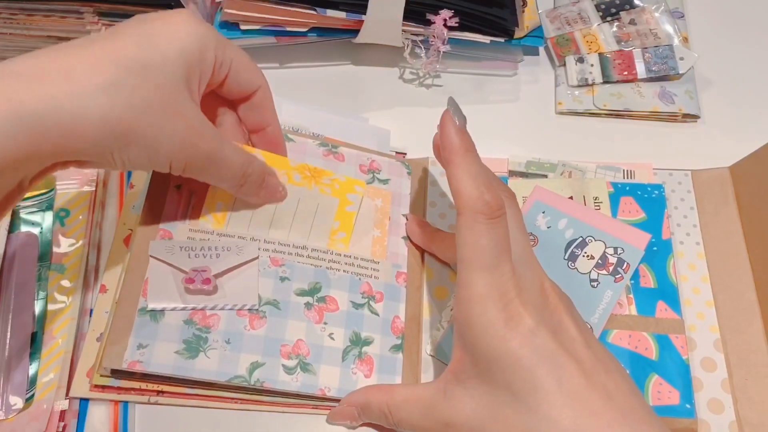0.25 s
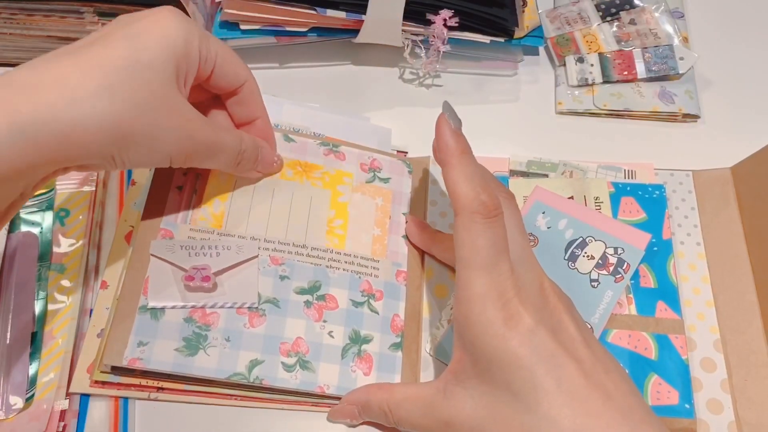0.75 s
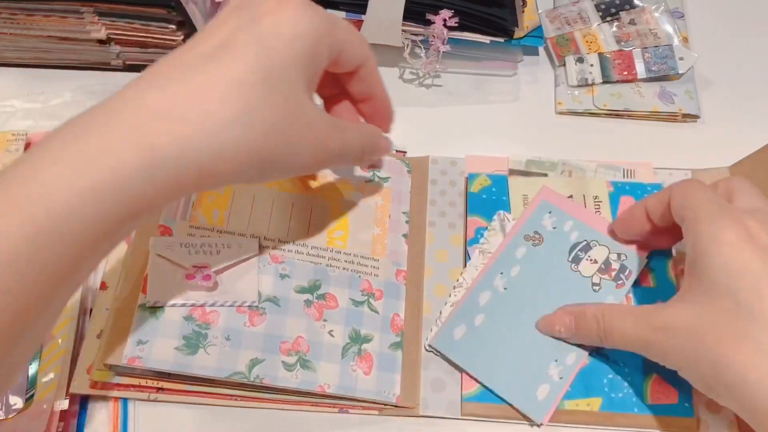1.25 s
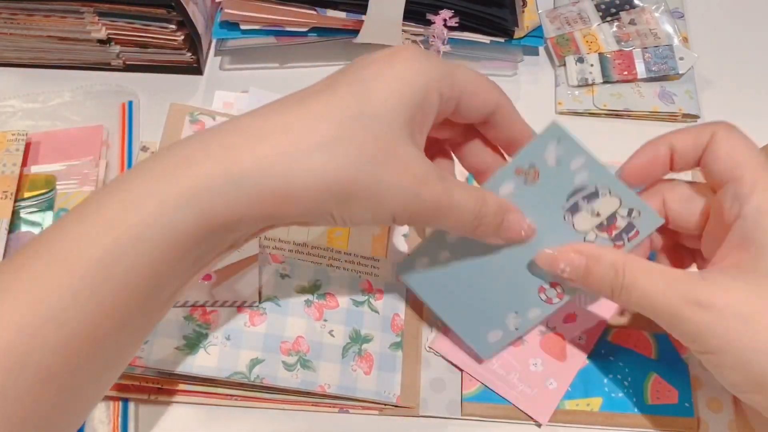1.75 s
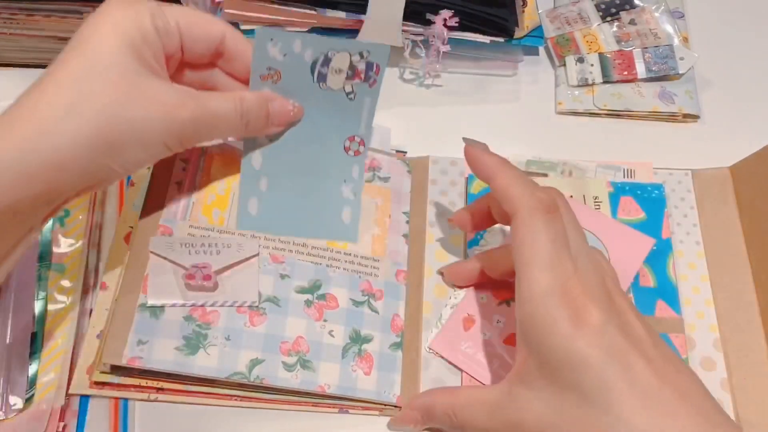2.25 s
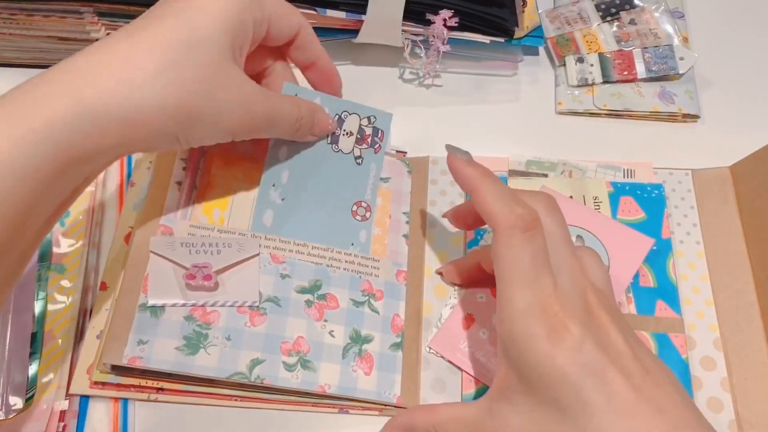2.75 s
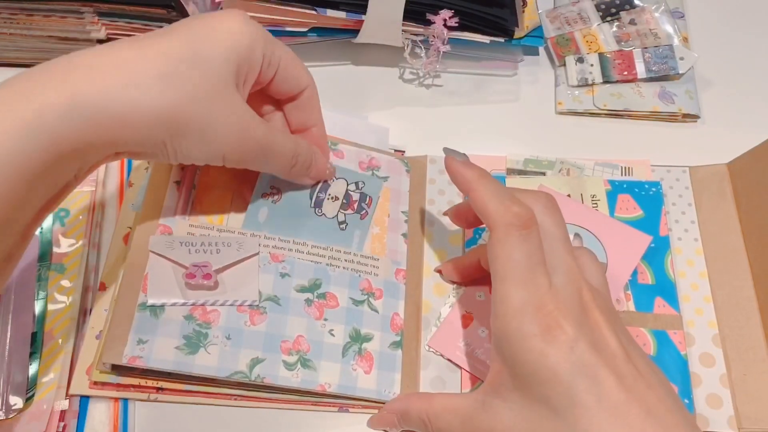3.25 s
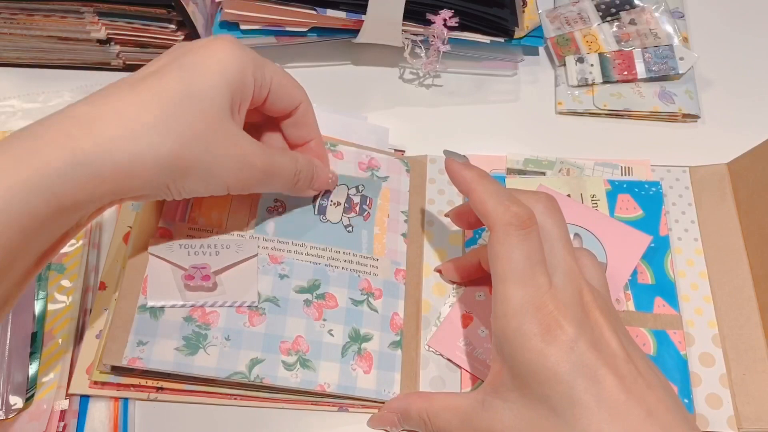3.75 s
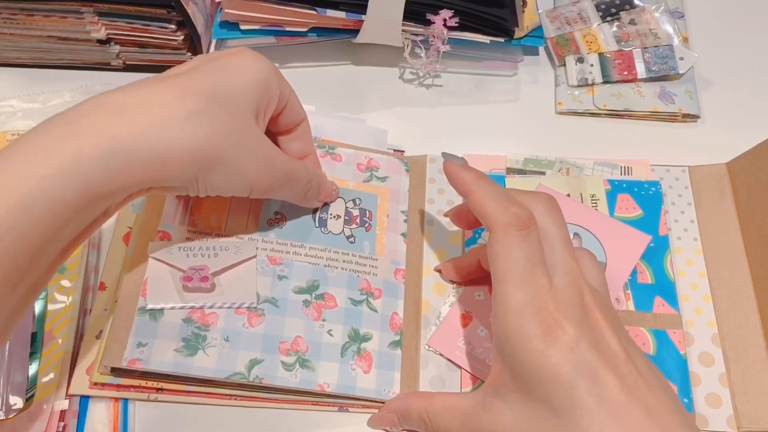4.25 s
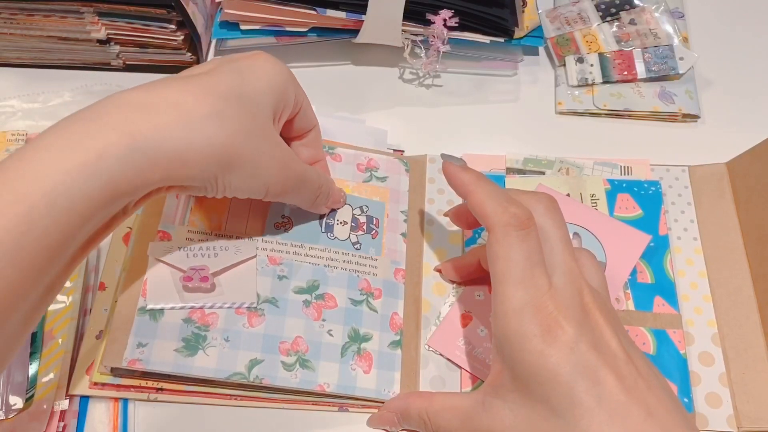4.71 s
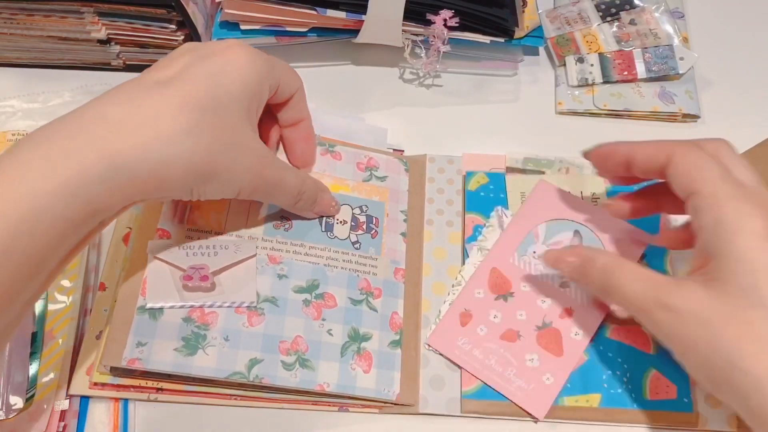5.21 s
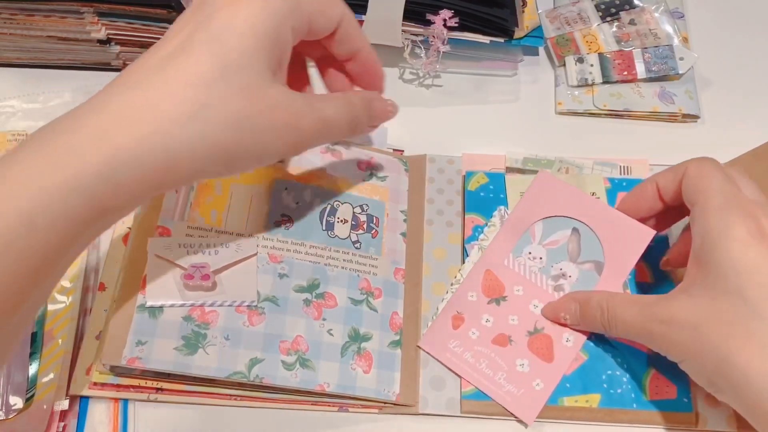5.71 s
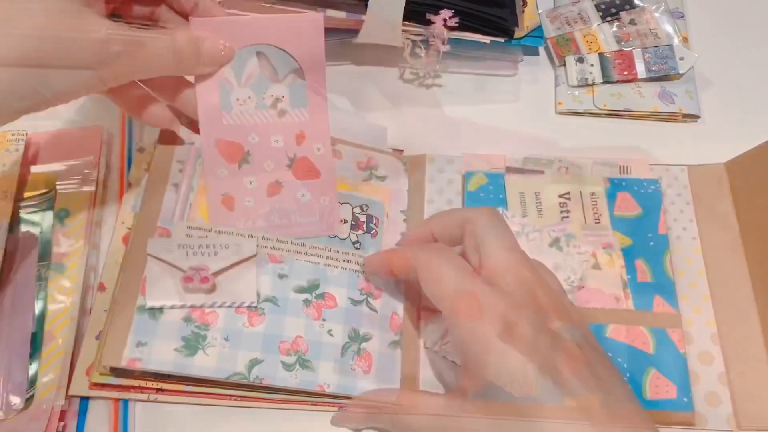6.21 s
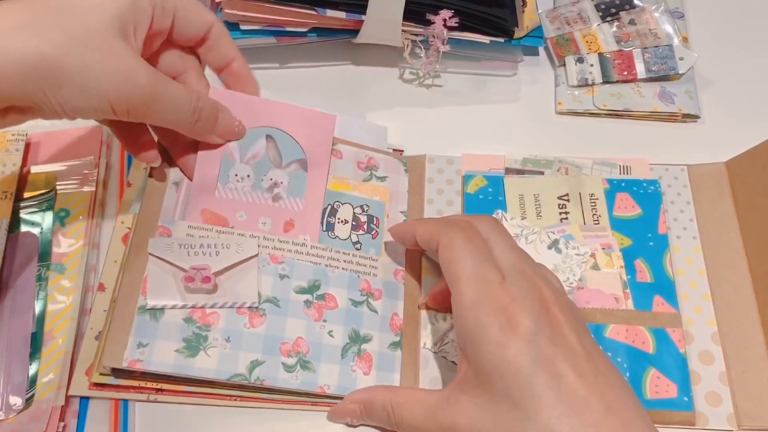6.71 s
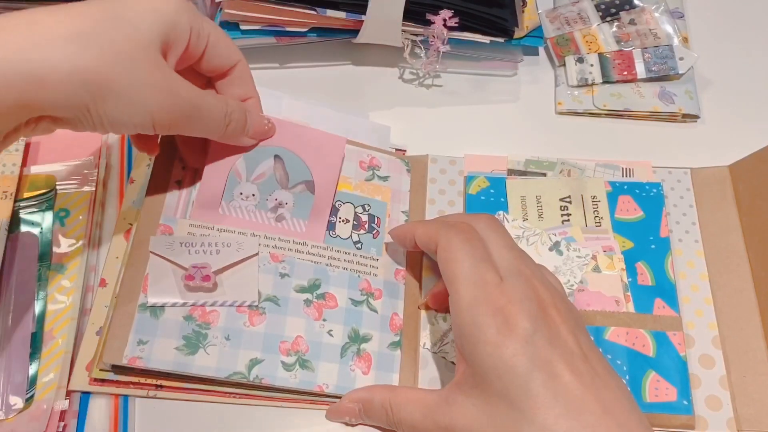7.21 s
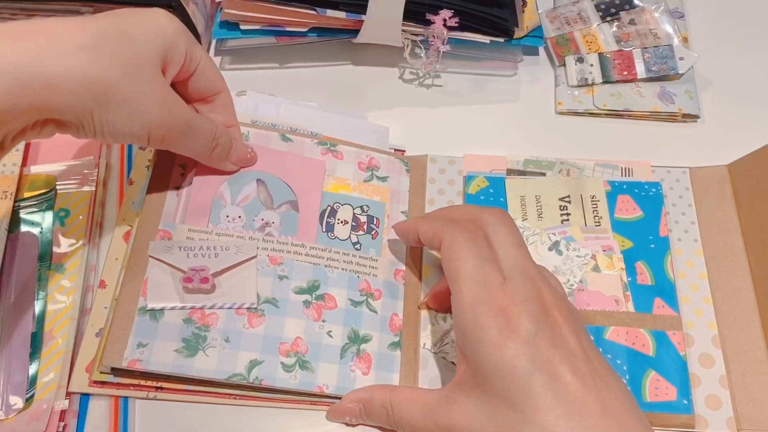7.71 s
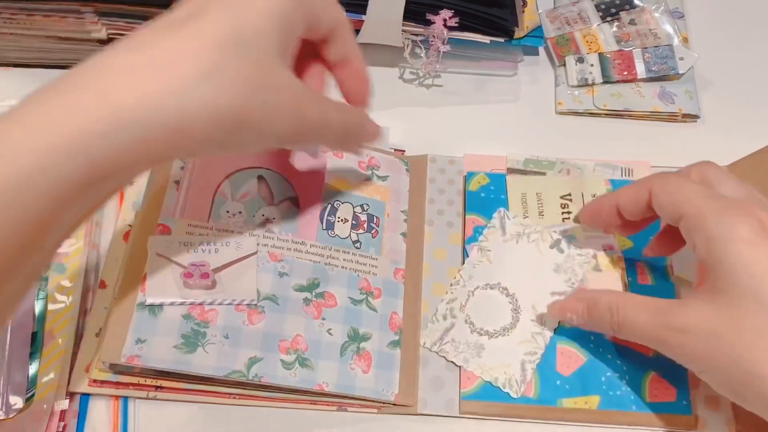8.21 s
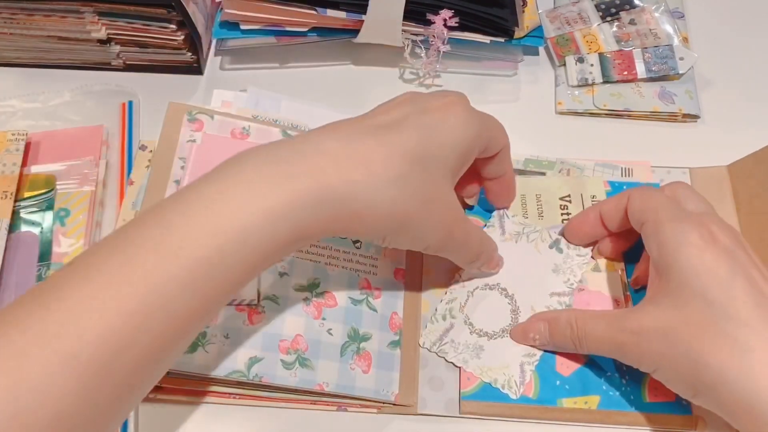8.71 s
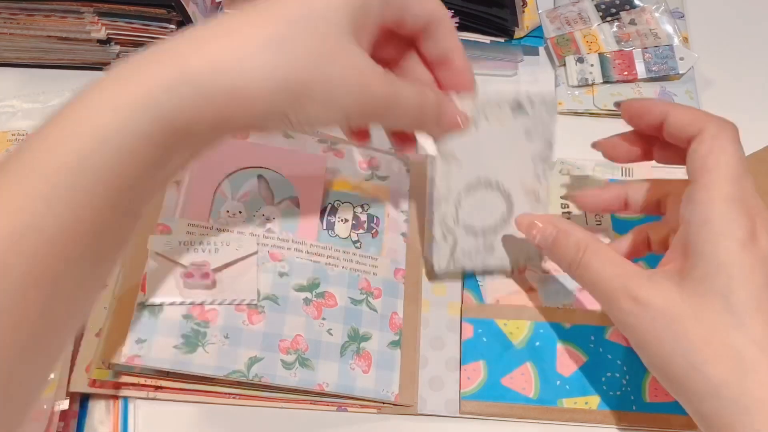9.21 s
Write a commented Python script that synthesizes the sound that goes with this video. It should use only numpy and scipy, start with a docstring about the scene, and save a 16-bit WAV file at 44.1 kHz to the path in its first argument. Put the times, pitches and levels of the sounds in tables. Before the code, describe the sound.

Close, quiet paper handling: a burst of sharp card snaps and a flap early, then gentle rustling strokes over a deep steady drone.

```python
"""On a desk in a small room, hands slide small cards out of and into a handmade journal's paper pockets.
Strokes of paper on paper are coloured friction noise that swells with the speed of the hand.
Edges and nails tick as short bursts, scraped cards ring with gliding resonances, one card flaps free.
A deep wavering sine hums over soft low noise; a stereo microphone pair sets the width."""
import sys
import numpy as np
from scipy import signal
from scipy.fft import rfft, irfft, next_fast_len
from scipy.io import wavfile

SR = 44100
rng = np.random.default_rng(int(sys.argv[2]) if len(sys.argv) > 2 else 0)


def master(y):
    """Save y as 16-bit WAV."""
    cut = np.clip(np.atleast_2d(y).T, -1, 1)
    pcm = np.round(cut * 32767)  # scale
    wavfile.write(sys.argv[1], SR, pcm.astype(np.int16))


N = 417186
TIME = np.arange(N) / SR
SIZE = next_fast_len(N + SR // 2)  # FFT length with room for tails
BINS = np.maximum(np.arange(SIZE // 2 + 1) * SR / SIZE, 1)  # Hz


def slides(rasp_db=-3.5, hiss_db=1.87, body_db=-6.5, judder_db=2.04, crackle_db=-7.5):
    """Paper rubs on paper: each stroke mixes rasp, its own share of hiss, and a slower-growing sheet body."""
    # Pushes and pulls of paper over paper. Each row: start in seconds, length in seconds,
    # share of the length at which the hand is fastest (0-1), relative level in dB, extra hiss in dB.
    strokes = [(-0.02, .14, 0.42, -50.5, 4), (0.108, 0.24, 0.24, -63.5, 0.5), (0.256, .11, 0, -57.5, -1),
               (0.374, 0.048, 0.4, -65, 1), (0.412, .12, 0.52, -53, 1), (0.576, .33, 0.15, -57.5, 1.5),
               (0.697, 0.068, 0.6, -56, 6), (0.896, 0.086, .6, -64.5, 8.5), (1.176, 0.14, 0, -68, 1),
               (1.384, 0.17, 0.1, -80.5, 2.5), (1.47, 0.19, 0.86, -58.5, 4), (1.768, 0.28, 0.7, -75.5, 3.5),
               (2.04, 0.27, 0.34, -61, 6), (2.158, 0.29, 0.47, -47, -1), (2.455, 0.26, 0.06, -66.5, 1),
               (2.7, 0.097, 0.46, -54.5, -2.5), (2.771, 0.3, 0.78, -51, 4), (3.081, 0.61, 0.05, -62.5, 2),
               (3.151, .17, 0.46, -49.5, -1), (3.4, 0.11, 0.59, -49.5, -2.5), (3.55, 0.25, 0.2, -51, -3),
               (3.876, 0.057, 0.24, -64.5, -0.5), (3.969, 0.1, 0.47, -73.5, 7.5),
               (4.064, 0.086, 0.5, -72.5, 9), (4.235, 0.061, 0.13, -73, 6.5), (4.297, 0.086, 0.5, -71, 5),
               (4.37, 0.096, 0.2, -61, -2), (4.489, 0.089, 0.5, -59.5, -2.5), (4.86, 0.2, 0.06, -63.5, 9),
               (5.035, .21, 0, -80.5, 3.5), (5.252, .1, 0.55, -73, -7), (5.345, 0.13, 0.22, -59, -3),
               (5.467, 0.14, 0.25, -68.5, -4), (5.625, 0.17, 0, -76, -2), (5.759, 0.2, 0.22, -65, 2.5),
               (5.952, 0.19, 0.79, -61.5, 1.5), (6.127, 0.14, 0.9, -61, -4),
               (6.277, 0.17, 0.6, -58.5, -3.5), (6.374, 0.29, 0.15, -53, 3.5), (6.686, 0.22, 0.44, -67, 5),
               (6.886, 0.18, 0.56, -55, -3.5), (7.076, 0.2, 0.33, -56, -2), (7.289, 0.085, 0.5, -57, -3),
               (7.332, 0.24, 0.33, -67.5, 0), (7.764, 0.25, 0.25, -63, 1), (8.672, 0.55, 0.41, -63, -6),
               (8.872, 0.245, 0.94, -53, -1), (9.301, 0.17, 0.63, -76, 7)]
    # Colours of the rasp, the hiss and the sheet body. Each row: frequency in Hz, relative dB per Hz.
    rasp_colour = [(1300, -17), (1900, -4), (2700, 5.5), (3400, 1), (4000, -0.5), (5000, -1.5), (5900, -17),
                   (7200, -9.5)]
    hiss_colour = [(3600, -34.5), (5200, -3.5), (6300, -1.5), (10500, 1), (12000, -0.5), (15500, -4)]
    body_colour = [(150, -31.5), (330, 2), (560, 6.5), (800, 2.5), (1050, -0.5), (1350, -5), (1700, 1),
                   (2300, -6)]
    rasp_growth, hiss_growth, body_growth = 0.99, 1, 0.65  # exponents on hand speed
    # a reference stroke level; the share of the dB above or below it that the body follows
    firm_db, body_follows = -56.5, 0.7
    lift_s = 0.041  # the sheets part gradually around the end of a stroke

    power = np.zeros((3, N))
    for start, length, fastest, level, bright in strokes:
        whole = length + lift_s / 2
        during = span(start, start + whole)
        speed = hand_speed(start, whole, fastest * length / whole)
        contact = np.clip((start + whole - TIME[during]) / lift_s, 0, 1)
        rasp = from_db(level + rasp_db) * speed ** rasp_growth
        hiss = from_db(level + bright + hiss_db) * speed ** hiss_growth
        body_level = firm_db + body_follows * (level - firm_db) + body_db
        body = from_db(body_level) * speed ** body_growth
        power[:, during] += (contact * np.array([rasp, hiss, body])) ** 2

    smooth = rng.standard_normal((2, N))
    # small creases give way
    crackle = friction(catches_per_s=110, size_db=-1.0, slip_s=0.00047, smooth_share=0)
    rub = off_hand(smooth + from_db(crackle_db) * crackle)
    rub = rub * from_db(judder_db * drift(17))  # the hand never moves quite evenly
    colours = (rasp_colour, hiss_colour, body_colour)
    return sum(gain * coloured(rub, colour) for gain, colour in zip(np.sqrt(power), colours))


def off_hand(x, echo_db=-10.5, lag_s=0.000893, travel=0.25):
    """The moving hand reflects the sound, so a comb of soft peaks wanders through it."""
    late = np.arange(N) - SR * lag_s * np.exp(travel * drift(0.84))
    echo = np.array([np.interp(late, np.arange(N), row) for row in x])
    return rms_one(x + from_db(echo_db) * echo)


def scrapes(fastest=0.48):
    """Fibres catch in a resonance that glides as the rubbing point travels along the card."""
    # An edge runs along a card, whose free length rings.
    # Each row: start in seconds, length in seconds, first pitch in Hz, last pitch in Hz, relative level in dB.
    card_runs = [(1.578, 0.053, 4550, 1970, -51), (1.65, 0.093, 890, 1760, -57),
                 (1.736, 0.041, 1990, 2940, -50), (4.87, 0.2, 5400, 5600, -75),
                 (5.353, 0.1, 3200, 1900, -68), (6.364, 0.25, 5600, 4770, -56),
                 (8.727, .031, 850, 1150, -52), (8.899, 0.026, 1110, 1310, -49),
                 (8.78, 0.2, 2530, 3300, -61.5), (9.037, 0.09, 5820, 5100, -51.5)]
    width = 0.09  # half width of the resonance as a share of its middle pitch
    out = np.zeros((2, N))
    grain = friction(catches_per_s=140, size_db=4.5, slip_s=0.0011, smooth_share=0.75)
    for start, length, first_hz, last_hz, db in card_runs:
        during = span(start, start + length)
        speed = hand_speed(start, length, fastest)
        glide_hz = np.geomspace(first_hz, last_hz, len(speed))
        turn = np.exp(2j * np.pi * np.cumsum(glide_hz) / SR)
        # shift the gliding pitch down to zero, keep a narrow band, shift it back up
        ring = passed(grain[:, during] / turn, width * np.sqrt(first_hz * last_hz), "low") * turn
        out[:, during] += from_db(db) * speed * rms_one(ring.real)
    return out


def ticks(level_db=-5.0, thud_stretch=1.8, thud_db=14.0, crack_db=3.5, crisp_db=2.0,
          crisp_db_per_octave=1.0, skid_db=-7.5, ring_width=0.28, apart_db=-11.0):
    """Edges and nails snap: broad crack, short card ring, page thud, faint skid; higher rings are crisper."""
    # Each row: time in seconds, relative level in dB, ring frequency in Hz, relative thud level in dB.
    snaps = [(.103, -37, 790, -10), (.26, -40.5, 2840, -18), (.587, -48.5, 2300, -7),
             (1.17, -43.5, 3060, -38), (1.204, -41, 1060, -16), (1.5, -20.5, 4170, -17),
             (1.564, -30.5, 4700, -17), (1.675, -31.5, 802, -12), (1.699, -27, 1210, -14),
             (1.711, -25, 985, -7), (1.72, -21.5, 1530, -5), (1.756, -35, 2300, -4),
             (1.773, -38.5, 2870, -6), (1.929, -47.5, 6200, -17), (2.055, -34, 7240, -13.5),
             (2.207, -38, 700, 2), (2.447, -41.5, 1320, -2), (2.466, -37, 2450, -10),
             (2.676, -50, 2900, -9), (3.415, -45, 2070, -9), (3.568, -40, 1700, -7),
             (4.871, -36, 7750, -16), (5.044, -46, 6000, -18), (5.341, -43, 1080, -1),
             (5.53, -27.5, 1100, -19), (5.849, -41, 2590, -23), (6.25, -43, 1160, -14),
             (7.775, -43.5, 6900, -11.5), (7.91, -32, 4160, -12), (8.311, -44.5, 6200, -17),
             (8.339, -40, 6900, -12.5), (8.535, -47, 1400, -8), (8.629, -44, 1310, -26),
             (8.719, -43, 3400, -21), (8.785, -44.5, 3300, -22), (8.91, -27.5, 1120, -15),
             (8.968, -25.5, 2150, -50), (9.021, -36.5, 2380, -26), (9.114, -35.5, 1364, -9)]
    attack_s = 0.0006
    # the crack dies first, the card rings briefly, the freed edge skids on a little
    crack_t60_s, ring_t60_s, skid_t60_s = 0.013, 0.019, 0.083
    out = np.zeros((2, N + SR))
    t = TIME[:SR // 4]
    onset = 1 - np.exp(-t / attack_s)
    crack = from_db(-60 * t / crack_t60_s)
    snap = from_db(-60 * t / ring_t60_s)
    dull = from_db(-60 * t / (ring_t60_s * thud_stretch))
    skid = from_db(-60 * t / skid_t60_s)
    for s, db, hz, thud in snaps:
        noise = rng.standard_normal((2, len(t))) * onset
        crispness = crisp_db + crisp_db_per_octave * np.log2(hz / 2000)
        parts = [(0, resonance(noise * snap, hz, ring_width * hz)),
                 (crack_db, passed(noise * crack, [900, 6000], "band")),
                 (thud + thud_db, passed(noise * dull, [220, 1300], "band")),
                 (crispness, passed(noise * crack, 6500, "high")),
                 (skid_db, passed(noise * skid, [1500, 11000], "band", order=1))]
        tick = sum(from_db(part_db) * rms_one(part) for part_db, part in parts)
        tick = np.array([rms_one(row) for row in tick]) * np.sqrt(np.mean(snap ** 2))
        at = max(round(s * SR), 0)
        out[:, at:at + len(t)] += from_db(db + level_db) * tick
    return out[:, :N] * from_db([[0], [apart_db]])


def flap(level_db=-41.5, apart_db=-9.0):
    """The bent card buckles in a quick run of dull slaps."""
    # The flap's dull colour. Each row: frequency in Hz, relative dB per Hz.
    flap_colour = [(90, 1), (330, -5.5), (700, -5), (1050, -10.5), (1600, -6.5), (2400, -16), (3500, -25),
                   (5000, -33), (9000, -33)]
    start_s, length_s, fastest, growth = 1.66, 0.125, 0.55, 0.74  # growth: exponent on speed
    slaps = friction(catches_per_s=200, size_db=5.0, slip_s=0.0017, smooth_share=0.28)
    effort = np.zeros(N)
    effort[span(start_s, start_s + length_s)] = hand_speed(start_s, length_s, fastest) ** growth
    return from_db(level_db) * effort * coloured(slaps, flap_colour) * from_db([[0], [apart_db]])


def hand_speed(start, length, fastest):
    """One movement, 0-1: the hand speeds up, is fastest at a share of the length, and slows to rest."""
    marks = start + length * np.array([0, np.clip(fastest, 0.02, 0.98), 1])
    return np.sin(np.interp(TIME[span(start, start + length)], marks, [0, np.pi / 2, 0]))


def friction(catches_per_s, size_db, slip_s, smooth_share):
    """Fibres catch and let go: brief slips of uneven size over a smooth rub; two unrelated noise rows."""
    sizes = from_db(size_db * np.minimum(rng.exponential(1, N), 4)) ** 2
    catches = (rng.random(N) < catches_per_s / SR) * sizes
    power = signal.lfilter([1], [1, -np.exp(-1 / (slip_s * SR))], catches + 1e-18)
    share = np.clip(smooth_share, 0, 1)
    return rng.standard_normal((2, N)) * np.sqrt(share + (1 - share) * power / power.mean())


def hum(hum_hz=52.34, hum_db=-47, rumble_db=-54.5, wander_hz=0.21, rumble_dip=0.56):
    """A distant motor drones on one deep, slightly wandering note over the rumble of moving air."""
    # The rumble's colour. Each row: frequency in Hz, relative dB per Hz.
    rumble_colour = [(20, -17), (36, -18), (50, 1.5), (66, -3), (82, 2.5), (100, -7), (150, -9), (178, -14),
                     (205, -8), (250, -18), (330, -23), (480, -20), (800, -31), (1400, -45.5), (4000, -53),
                     (15000, -61)]
    # The hum dips briefly. Each row: time in seconds, level change in dB.
    hum_dip = [(5.78, 0), (6.02, -10), (6.3, 0)]
    phase = 2 * np.pi * np.cumsum(hum_hz + wander_hz * drift(1.94)) / SR
    dip_db = np.interp(TIME, *np.transpose(hum_dip))
    tone = np.sqrt(2) * np.sin(phase) * from_db(hum_db + dip_db)
    # the rumble follows a share of the dip
    air = from_db(rumble_db + rumble_dip * dip_db) * coloured(rng.standard_normal((2, N)), rumble_colour)
    return air + np.outer([1, 0], tone)


def room(x, wet_db, wall_hz=9000, t60_s=0.13):
    """The walls return a short, duller tail: row 0 convolved with decaying low-passed noise."""
    t = TIME[:SR // 2]
    noise = passed(rng.standard_normal((2, len(t))), wall_hz, "low", order=1)
    tail = noise * from_db(-60 * t / t60_s) * (t > 0.004)
    tail = tail / np.sqrt(np.sum(tail ** 2, axis=1, keepdims=True))  # unit energy
    return from_db(wet_db) * signal.fftconvolve(x[:1], tail, axes=1)[:, :N]


def microphones(x, aside):
    """Row 0 reaches both sides alike, row 1 sets them apart; aside (0-1) scales phase and balance."""
    # Phase between the sides. Each row: frequency in Hz, lead of the left in radians at full aside.
    lead = [(20, 0), (800, .05), (1500, .45), (2500, 1.4), (3300, 1.1), (3800, 0), (5300, -.6), (6400, 0),
            (7400, 0), (8500, -np.pi), (9500, -np.pi), (10500, -2 * np.pi), (11600, -2 * np.pi),
            (12700, -3 * np.pi), (13600, -3 * np.pi), (14500, -4 * np.pi)]
    # Coherence of the pair. Each row: frequency in Hz, likeness of the sides (0-1).
    likeness = [(60, 0.93), (130, 0.95), (300, 0.8), (700, 0.31), (2800, 0.89), (4000, 0.49), (5800, 0.64),
                (6600, 1), (15000, 1)]
    # Level between the sides. Each row: frequency in Hz, left minus right in dB at full aside.
    balance = [(60, -2.5), (200, 1.5), (700, 2), (2400, 4.5), (4400, 5), (6800, 0)]
    shared, apart = rfft(x, SIZE)
    alike = np.clip(at_hz(likeness), 0, 1)
    sides = np.array([[1], [-1]])
    pair = np.sqrt((1 + alike) / 2) * shared + sides * np.sqrt((1 - alike) / 2) * apart
    pair = pair * from_db(aside * sides * at_hz(balance) / 2)
    pair[0] *= np.exp(1j * aside * at_hz(lead))
    return irfft(pair, SIZE)[:, :N]


def from_db(db):
    """Decibels to gain."""
    return 10 ** (np.asarray(db) / 20)


def rms_one(x):
    """Scale to unit rms."""
    return x / np.sqrt(np.mean(x ** 2) + 1e-20)


def at_hz(points):
    """Read a table on a log-frequency axis."""
    hz, value = np.transpose(points)
    return np.interp(np.log(BINS), np.log(hz), value)


def span(start, end):
    """The samples between two times in seconds."""
    return slice(max(round(start * SR), 0), min(round(end * SR), N))


def coloured(x, spectrum):
    """Give noise a spectrum that falls away steeply past its ends; rms 1."""
    beyond = np.maximum(spectrum[0][0] / BINS, 1) * np.maximum(BINS / spectrum[-1][0], 1)
    gain = from_db(at_hz(spectrum)) / beyond ** 4
    return rms_one(irfft(rfft(x, SIZE) * gain, SIZE)[..., :N])


def drift(rate):
    """Smooth random curve of rms 1 that changes about rate times a second."""
    return rms_one(irfft(rfft(rng.standard_normal(N), SIZE) / (1 + (BINS / rate) ** 2), SIZE)[:N])


def passed(x, hz, kind, order=2):
    """Causal low-, high- or band-pass."""
    hz = np.clip(hz, 20, 0.45 * SR)
    return signal.sosfilt(signal.butter(order, hz, kind, fs=SR, output="sos"), x)


def resonance(x, hz, width_hz):
    """One two-pole resonance with gain of about 1 on top."""
    r = np.exp(-np.pi * width_hz / SR)
    feed = np.array([1, 0, -1]) * (1 - r * r) / 2
    return signal.lfilter(feed, [1, -2 * r * np.cos(2 * np.pi * hz / SR), r * r], x)


def scene():
    """Sliding paper and all echoes spread wide; ticks, the flap and the hum sit near the middle."""
    rubbing = slides() + scrapes()
    snapping = ticks() + flap()
    around = rubbing + room(rubbing, wet_db=-21.0) + room(snapping, wet_db=-13.5)
    return microphones(around, aside=0.97) + microphones(snapping, aside=0.2) + microphones(hum(), aside=0.15)


def record(dry):
    """A steep elliptic low-pass cuts the top above 16 kHz."""
    return signal.sosfilt(signal.ellip(10, 0.1, 80, 16000, fs=SR, output="sos"), dry)


dry = scene()
out = record(dry)
master(out)
```